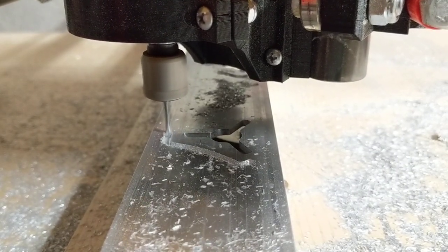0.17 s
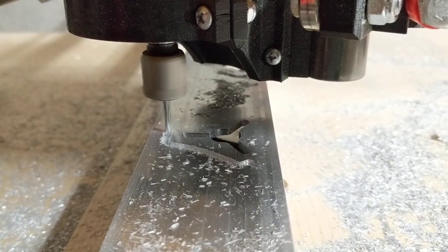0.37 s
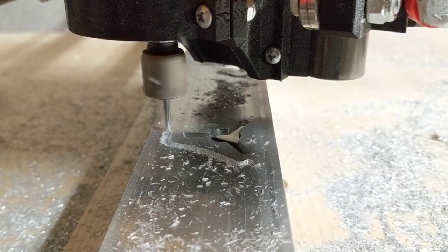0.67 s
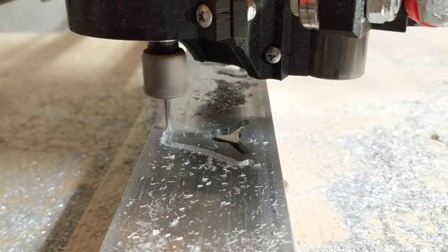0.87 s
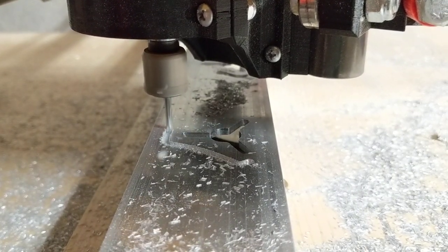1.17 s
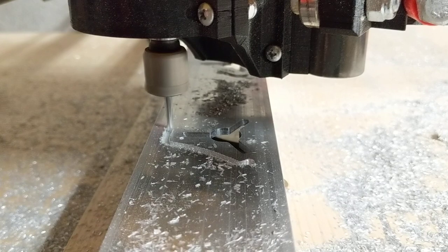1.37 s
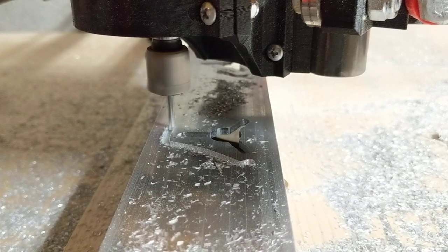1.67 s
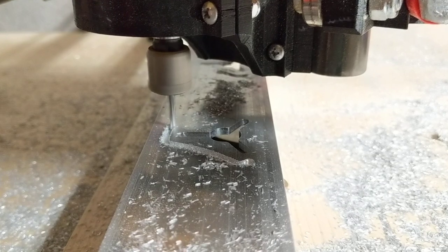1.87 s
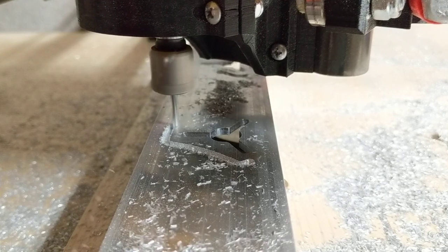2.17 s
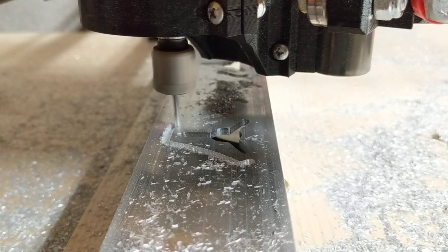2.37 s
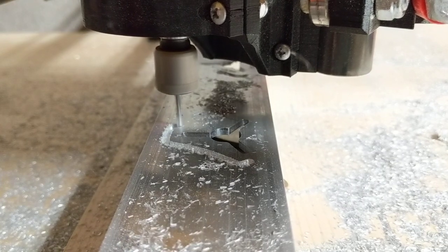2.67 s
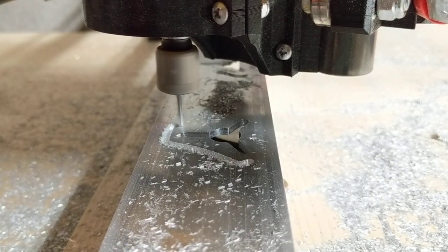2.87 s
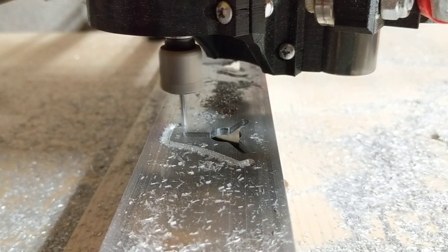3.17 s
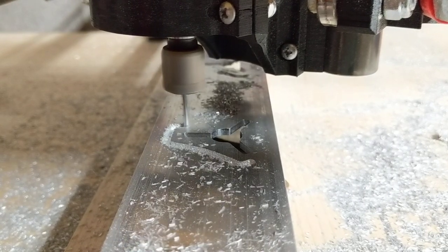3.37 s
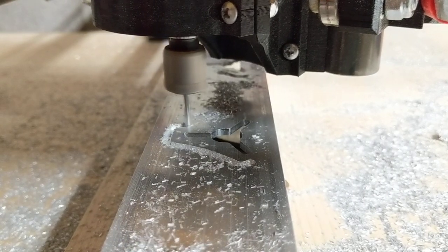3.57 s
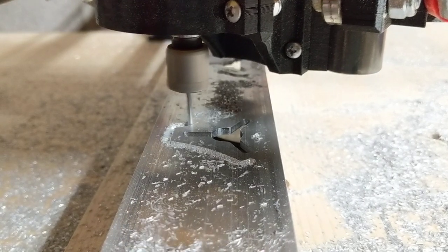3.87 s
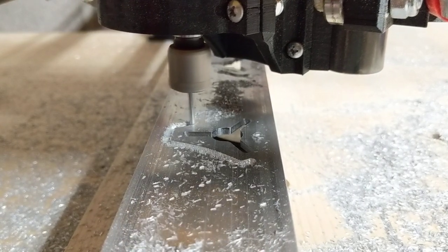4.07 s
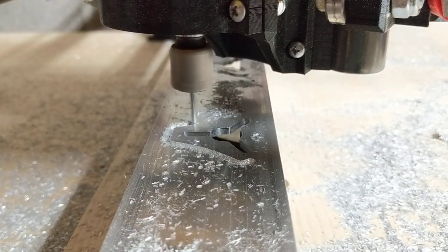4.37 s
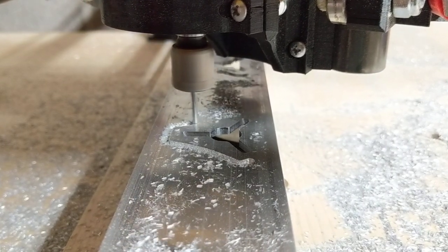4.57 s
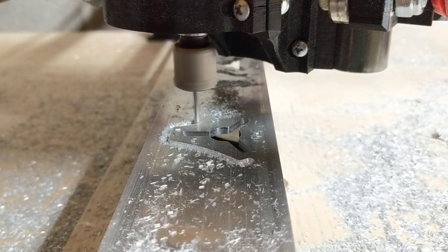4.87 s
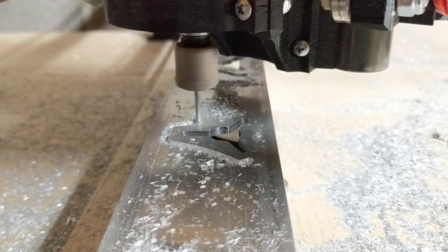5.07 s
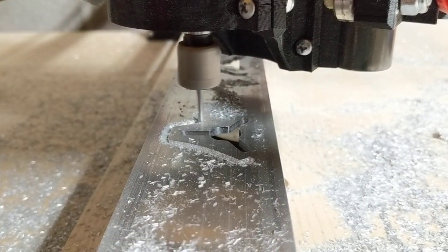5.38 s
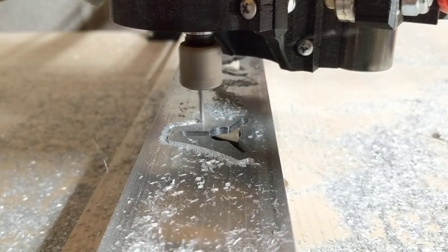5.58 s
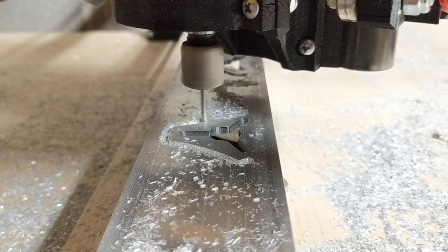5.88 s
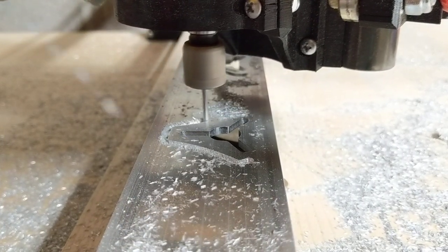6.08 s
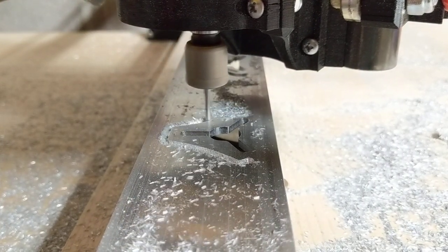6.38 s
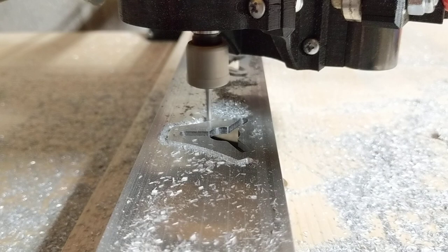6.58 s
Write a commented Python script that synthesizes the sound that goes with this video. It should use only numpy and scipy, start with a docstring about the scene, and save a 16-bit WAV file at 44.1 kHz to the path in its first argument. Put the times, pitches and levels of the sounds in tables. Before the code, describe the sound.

A small router spindle cuts an aluminium bar in a workshop, heard close up. A piercing, rough squeal flickers over the motor's whine and hum, rushing cooling air and the hiss of chips. About two seconds in, the motor sags slightly while the squeal steps a little higher and strengthens, with a few tiny breaks. The cut then runs on more steadily, the hum faded and a faint table rumble underneath.

```python
"""A small router spindle mills a slot in an aluminium bar, close by.
From the start the cutter bites once a turn and chatters near 8 kHz, flaring when it catches,
over chip hiss, motor whine and cooling air. At about 2 s it rounds a corner: the speed sags,
the squeal steps up one harmonic and grows stronger, with brief dropouts until 3.3 s.
Along the new slot the squeal is steadier, the hum has faded and the table rumbles more."""
import sys
import numpy as np
from scipy import signal
from scipy.fft import rfft, irfft
from scipy.io import wavfile

SR = 44100
rng = np.random.default_rng(int(sys.argv[2]) if len(sys.argv) > 2 else 0)


def persist_wave(psi):
    """Save psi, clipped to +-1, as 16-bit WAV."""
    counts = np.round(np.clip(psi, -1, 1) * 32767).astype(np.int16)
    wavfile.write(sys.argv[1], SR, np.atleast_2d(counts).T)


N = 296793
TIME_S = np.arange(N) / SR
BINS_HZ = np.fft.rfftfreq(N, 1 / SR)

# spindle speed: t/s, f/Hz
SPINDLE_HZ = [(0, 424.4), (0.5, 422.7), (1.4, 423.1), (1.8, 419.7), (2.28, 412.7), (3.0, 411.8),
              (3.25, 410.2), (4.2, 408.6), (4.8, 409.2), (5.2, 408.4), (6.73, 408.8)]
# progress round the corner: t/s, fraction 0-1
CORNER_PROGRESS = [(0, 0.01), (1.55, 0), (1.8, .2), (2.0, 0.8), (2.4, 0.8), (3.3, 1), (6.73, 0.98)]
# cutter strain, highest just after the corner; sources follow a share of it: t/s, gain/dB
STRAIN_DB = [(0, -2), (1.4, -4.5), (1.9, 3.5), (2.4, 4), (3, 1), (3.6, 0), (4.5, -2.5), (5.5, -2),
             (6.73, -3)]
# chatter: shaft harmonic, level before corner/dB, level after/dB, roughness 0-1, strain share
CHATTER_LINES = [(4, -30.5, -37, 1, -0.31), (5, -30.5, -31.5, 0.82, 0.69), (6, -30, -44, 0.83, 0.57),
                 (14, -28, -42, 0.6, 0.75), (15, -29.5, -28.5, 0.64, 0.07), (16, -27.5, -32, 0.25, 0.023),
                 (17, -21, -25.5, 0.75, 0.13), (18, -19, -20.5, 0.16, -.2), (19, -22.5, -13.5, 0.1, 0.48),
                 (20, -29, -21, 0.07, 0.13), (21, -26.5, -32.5, 0.06, 0.29), (22, -23.5, -33, 0.26, 0.65),
                 (23, -28.5, -25, 0.47, 0.061), (24, -41, -33, 0.65, -0.14), (25, -54, -38.5, 0.6, 0),
                 (26, -36, -42, 0.9, 0.39), (27, -46, -46, 0.7, 0), (29, -50, -41.5, 0.6, 0.45),
                 (32, -40, -41, 0.8, 0), (33, -47, -44, 0.8, .5), (34, -50, -45, .6, 0),
                 (35, -50, -46, 0.5, 0), (37, -42, -38, .5, -.4), (38, -53, -37, 0.2, .8)]
# chatter offset from the shaft harmonics: t/s, offset/Hz
SLIP_HZ = [(0, -16.6), (1.65, -5.1), (1.95, -36.3), (2.45, -21.3), (2.95, -19.4), (3.18, -36.7),
           (3.4, -19.3), (4.5, -27.4), (6.73, -22.7)]
# a second mode pulls the upper lines flat before the corner: shaft harmonic, offset/Hz
MODE_PULL_HZ = [(4, 0), (16, -1), (17, -11.5), (18, -1.5), (19, -41.5), (20, -49), (21, -27.5), (22, -42.5),
                (24, -46.5), (38, -40)]
# cutter catches: t/s, gain/dB, half-width/s
CATCHES = [(0.034, 6, 0.099), (.635, 4, 0.027), (1.43, 5.5, 0.11)]
# chatter collapses under strain: t/s, depth/dB
DROPOUTS = [(1.925, 10), (2.06, 1), (2.27, 6), (2.362, 5), (3.18, 5), (3.29, 5)]
# cutting-edge scrape spectrum: f/Hz, relative level/dB
SCRAPE_DB = [(3500, -68), (4700, -11.5), (5200, -4), (6150, -0.5), (6550, -9), (7100, -0.5), (7600, 3),
             (8050, -24), (8500, -19), (9500, -14.5), (10400, -15.5), (13700, -14.5), (14400, -21),
             (15600, -30)]
# motor and fan tones: shaft harmonic, level before corner/dB, level after/dB, strain share
MOTOR_TONES = [(2, -25.5, -22, -0.27), (3, -29.5, -30.5, 0.1), (4, -37, -31, 1), (5, -34.5, -39, 0.28),
               (6, -34.5, -37, 1), (7, -37.5, -44.5, 0.99), (9, -43.5, -43, 0.19), (12, -32, -41, 0.64),
               (13, -28, -31, 0.025), (14, -38, -49, 0), (16, -28, -57, 0.25), (19, -35, -52, 0),
               (20, -44, -66, 0), (21, -30.5, -56, -0.047), (22, -35, -59, 0.32), (26, -40, -41, 0.69)]
# once-a-turn hum of the side force: t/s, level/dB
HUM_DB = [(0, -28.5), (.7, -26), (1.4, -26), (1.75, -22), (2.22, -29.5), (2.33, -42), (3.2, -36),
          (6.73, -48.5)]
# cooling air and rasp spectrum: f/Hz, relative level/dB
AIR_DB = [(20, -25), (190, -16), (300, -16), (540, -31), (700, -2.5), (1150, -0.5), (1400, -2),
          (2200, -0.5), (2700, -3.5), (3200, -7.5), (4400, -10), (7000, -25), (16000, -55)]
# housing and frame resonances: f/Hz, width/Hz, relative level/dB
HOUSING_MODES = [(398, 43.6, -1), (743, 129, 0.5), (959, 88, 3.5), (1770, 170, 1.5)]
# table and gantry spectrum: f/Hz, relative level/dB
RUMBLE_DB = [(20, -17), (42, -20), (70, -2.5), (110, -1.5), (205, 3.5), (255, 0.5), (390, 3), (560, -6.5),
             (1500, -29), (16000, -83)]


def chatter(angle, corner, drift_hz=5, quaver_hz=13, rough_width_hz=55, skirt_hz=260, waver_db=0.05):
    """The cutter recuts its last turn's ripples, ringing once a turn: lines that quaver together."""
    resonant_harmonic, flaring_harmonic = 19, 18
    tearing = rng.standard_normal(N) * bite(angle, sharpness=2.0)
    slip_rad = phase_rad(curve(SLIP_HZ) + drift_hz * wander(rate_hz=5) + quaver_hz * wander(rate_hz=45))
    pull_rad_per_hz = phase_rad((1 - corner) ** 2)
    pull_rad_per_hz -= pull_rad_per_hz[-1]  # lines fall into step past the corner
    dispersion_rad = 1.2 * (1 - corner) + 0.52 * corner  # the metal smears each bite into a chirp
    flare = catch_gain()
    comb = np.zeros(N)
    for k, before_db, after_db, roughness, strain_share in CHATTER_LINES:
        k = round(k)
        level = load_gain(corner, before_db, after_db, strain_share)
        if k == flaring_harmonic:
            level *= flare
        pull_rad = pull_rad_per_hz * np.interp(k, *np.transpose(MODE_PULL_HZ))
        lag_rad = dispersion_rad * (k - resonant_harmonic) ** 2
        carrier = np.exp(1j * (k * angle + slip_rad + pull_rad - lag_rad))
        noise_share = np.clip(roughness + 0.054 * (1 - corner), 0, 1)  # looser lock before the corner
        ripple = unit_rms(smooth(smooth(tearing * carrier.conj(), rough_width_hz), skirt_hz))
        envelope = np.sqrt(1 - noise_share) + np.sqrt(noise_share) * ripple
        comb += level * (carrier * envelope).real
    return np.sqrt(2) * comb * dropout_gain() * gain(waver_db * wander(rate_hz=39))


def bite(angle, sharpness):
    """The edge is in the metal for part of each turn."""
    return unit_rms(np.exp(sharpness * np.cos(angle)))


def catch_gain(flicker_db=2):
    """The least stable line flickers throughout and swells when the cutter catches."""
    swell_db = sum(db * np.exp(-((TIME_S - at_s) / width_s) ** 2) for at_s, db, width_s in CATCHES)
    return gain(swell_db + flicker_db * wander(rate_hz=20))


def dropout_gain(half_width_s=0.0042):
    """All chatter lines dip when the chatter loses its grip."""
    return gain(-sum(db * np.exp(-((TIME_S - at_s) / half_width_s) ** 2) for at_s, db in DROPOUTS))


def chip_scrape(angle, corner):
    """Each bite tears off a chip with a puff of hiss."""
    puffs = rng.standard_normal(N) * bite(angle, sharpness=0.38)
    hiss = coloured(puffs, spectrum(SCRAPE_DB))
    return hiss * load_gain(corner, before_db=-19.6, after_db=-21.5, strain_share=0.2)


def motor(angle, corner, waver_db=1.06, hum_flutter_db=2.0):
    """Shaft-locked tones over the side-force hum, which flutters once faded."""
    tones = gain(curve(HUM_DB) + hum_flutter_db * corner ** 4 * wander(rate_hz=8)) * np.sin(angle)
    for k, before_db, after_db, strain_share in MOTOR_TONES:
        level = load_gain(corner, before_db, after_db, strain_share)
        level *= gain(waver_db * wander(rate_hz=18))
        tones += level * np.sin(round(k) * angle + 2 * np.pi * rng.random())
    return np.sqrt(2) * tones


def cooling_air(corner, flutter_db=0.5):
    """Fan turbulence and cutting rasp, coloured by the housing."""
    power = spectrum(AIR_DB) ** 2
    for mode_hz, width_hz, db in HOUSING_MODES:
        power += gain(db) ** 2 / (1 + ((BINS_HZ - mode_hz) / width_hz) ** 2) ** 2
    rush = coloured(rng.standard_normal(N), np.sqrt(power))
    level = load_gain(corner, before_db=-19.5, after_db=-22.5, strain_share=0.2)
    return rush * level * gain(flutter_db * wander(rate_hz=31))


def table_rumble(corner, swell_db=1.3):
    """The cut shakes the table, more along the new slot."""
    shake = coloured(rng.standard_normal(N), spectrum(RUMBLE_DB))
    level = load_gain(corner, before_db=-50, after_db=-41.5, strain_share=0.45)
    return shake * level * gain(swell_db * wander(rate_hz=3.8))


def load_gain(corner, before_db, after_db, strain_share):
    """Power crossfade round the corner, raised or lowered by a share of the strain."""
    power = (1 - corner) * gain(before_db) ** 2 + corner * gain(after_db) ** 2
    return np.sqrt(power) * gain(strain_share * curve(STRAIN_DB))


def gain(db):
    """dB to amplitude."""
    return 10 ** (np.asarray(db) / 20)


def unit_rms(x):
    """Scale to rms 1."""
    return x / np.sqrt(np.mean(abs(x) ** 2) + 1e-20)


def phase_rad(hz):
    """Running phase of a frequency curve."""
    return 2 * np.pi * np.cumsum(hz) / SR


def curve(rows):
    """Linear interpolation of (t/s, value) rows."""
    return np.interp(TIME_S, *np.transpose(rows))


def spectrum(rows):
    """Gain per bin from (f/Hz, level/dB) rows."""
    hz, db = np.transpose(rows)
    return gain(np.interp(np.log(BINS_HZ + 1), np.log(hz + 1), db))


def coloured(x, bin_gains):
    """Spectral shaping to rms 1."""
    return unit_rms(irfft(rfft(x) * bin_gains, N))


def smooth(x, width_hz):
    """One-pole low-pass, cutoff at half the line width."""
    pole = np.exp(-np.pi * width_hz / SR)
    return signal.lfilter([1 - pole], [1, -pole], x)


def wander(rate_hz):
    """Slow random curve, rms 1."""
    knots = rng.standard_normal(8192)
    return unit_rms(np.interp(TIME_S * 2 * rate_hz, np.arange(len(knots)), knots))


def scene(hunt_hz=0.154):
    """One slightly hunting shaft drives motor and cutter; both channels are alike."""
    angle = phase_rad(curve(SPINDLE_HZ) + hunt_hz * wander(rate_hz=3))
    corner = np.clip(curve(CORNER_PROGRESS), 0, 1)
    mill = motor(angle, corner) + chatter(angle, corner) + cooling_air(corner)
    mill += chip_scrape(angle, corner) + table_rumble(corner)
    return np.array([mill, mill])


def record(dry, ceiling=0.69, cutoff_hz=15750):
    """Soft peak limit, then low-pass."""
    limited = dry / (1 + (dry / ceiling) ** 6) ** (1 / 6)
    lowpass = signal.firwin(511, cutoff_hz, window=("kaiser", 9), fs=SR)
    return signal.oaconvolve(limited, lowpass[None], "same")


dry = scene()
out = record(dry)
persist_wave(out)
```